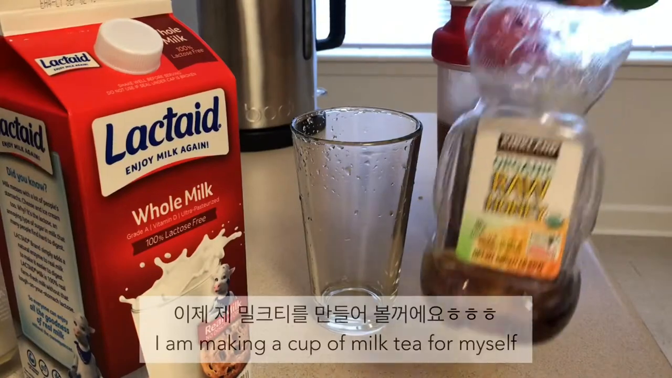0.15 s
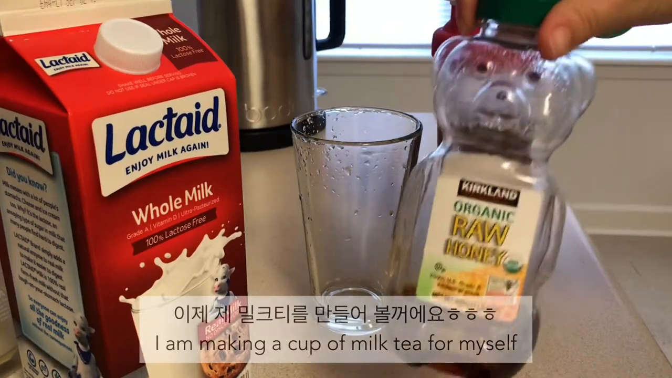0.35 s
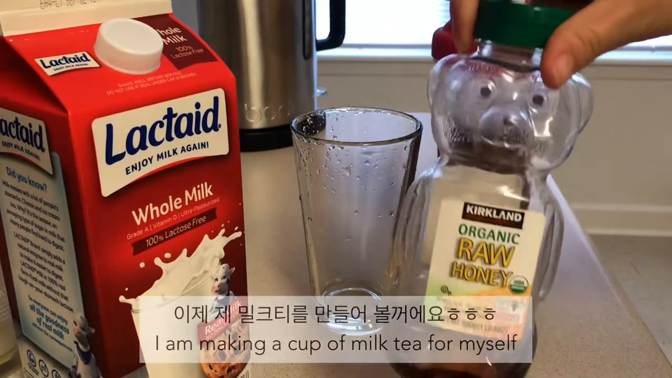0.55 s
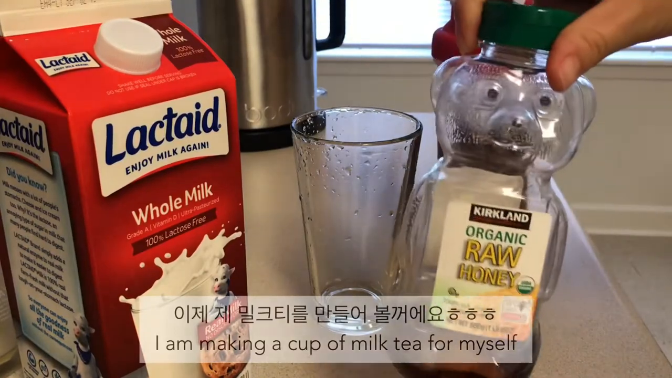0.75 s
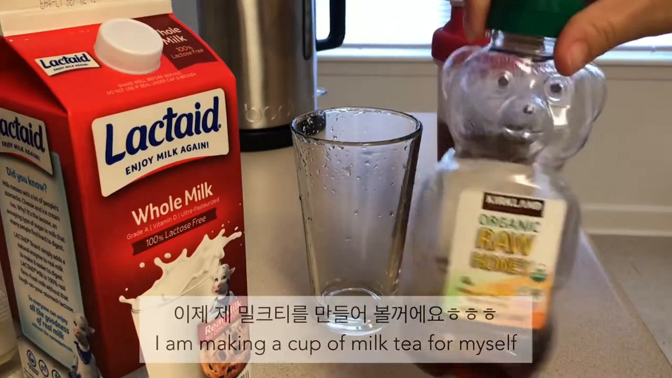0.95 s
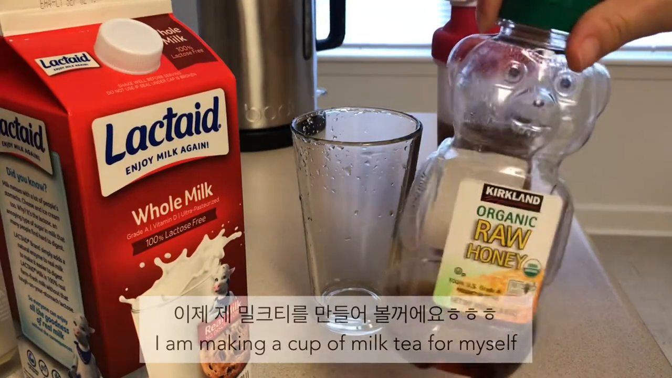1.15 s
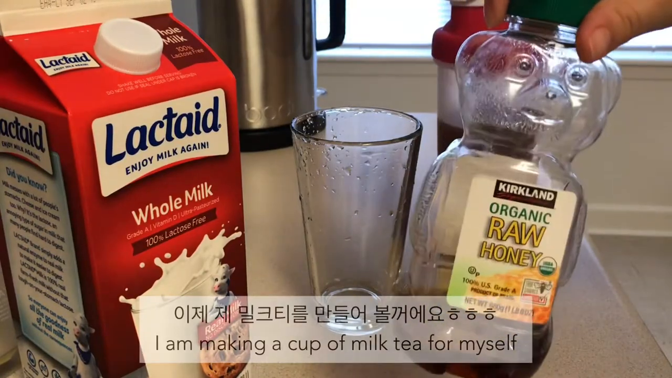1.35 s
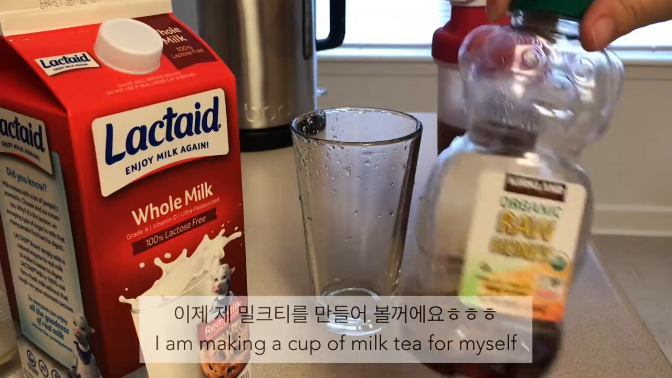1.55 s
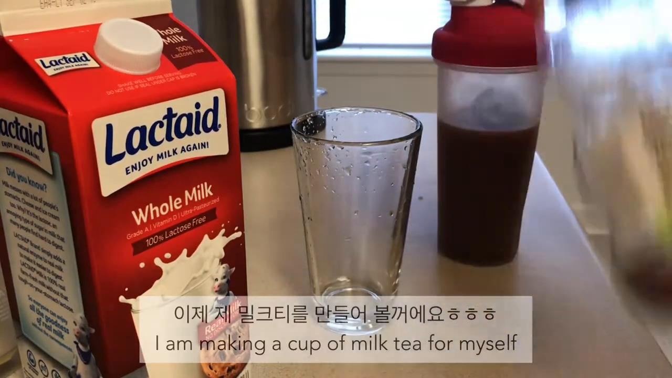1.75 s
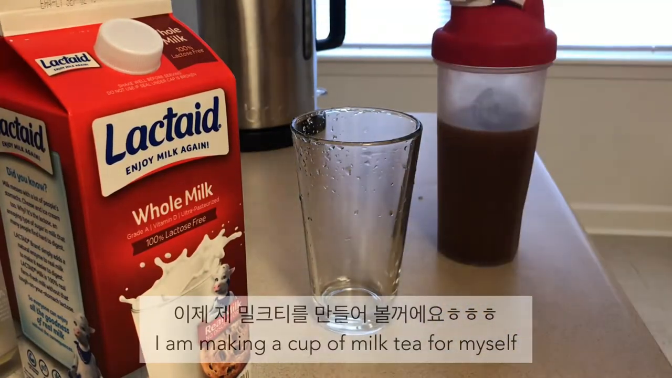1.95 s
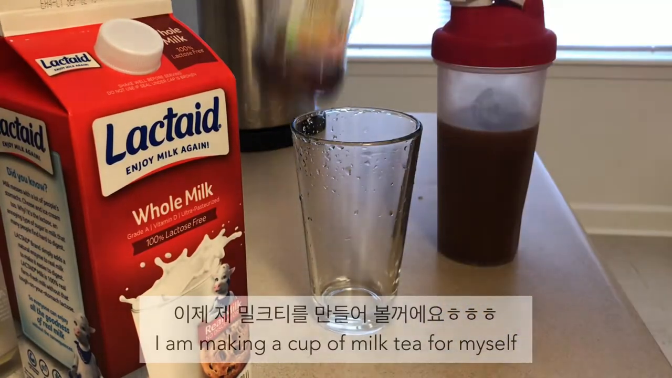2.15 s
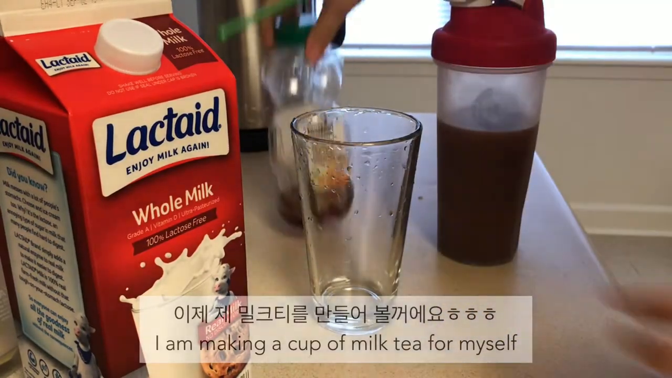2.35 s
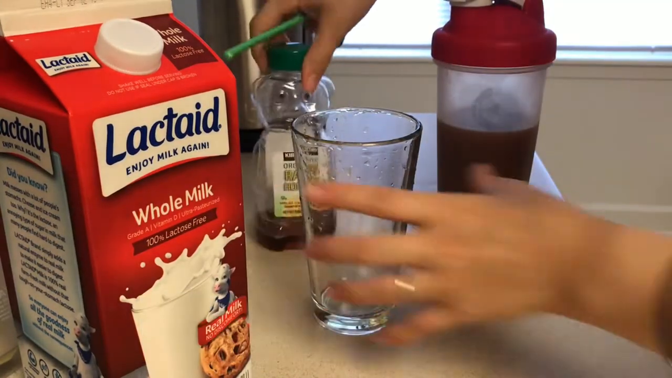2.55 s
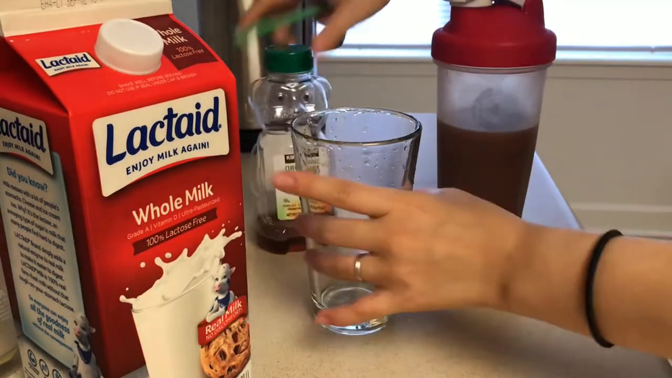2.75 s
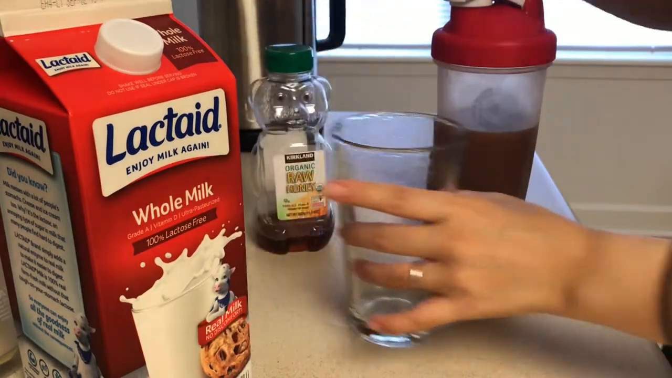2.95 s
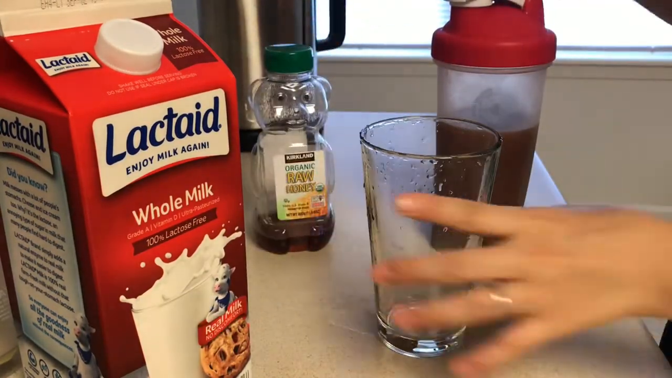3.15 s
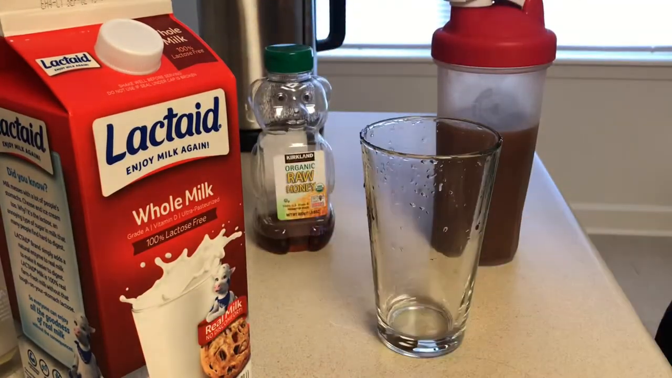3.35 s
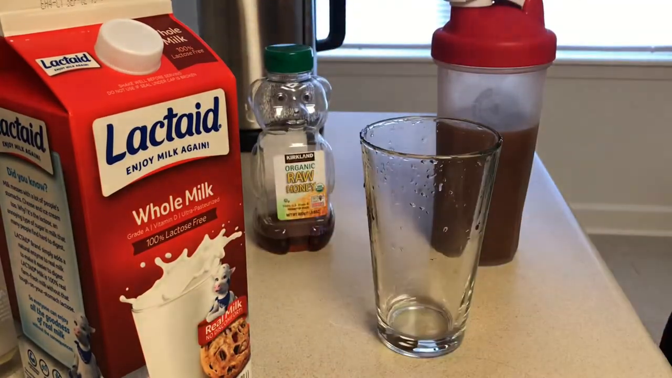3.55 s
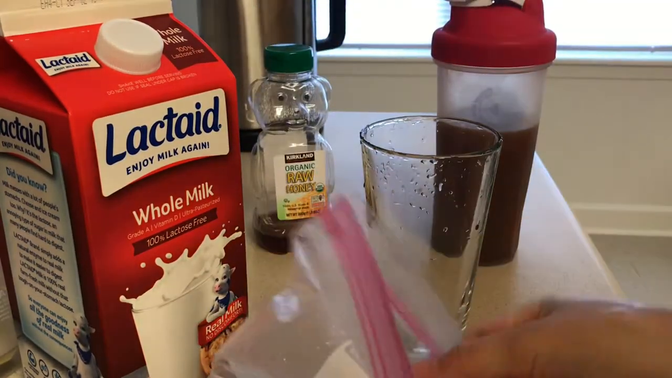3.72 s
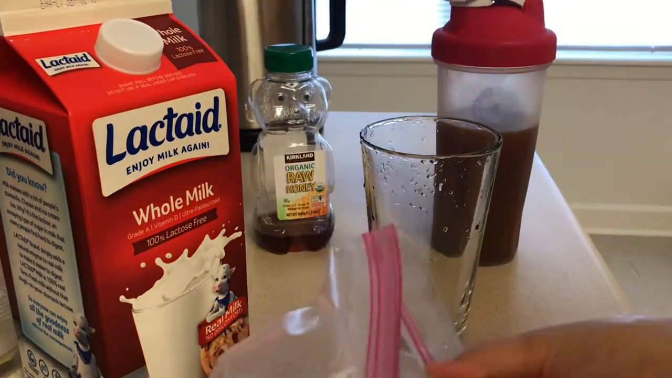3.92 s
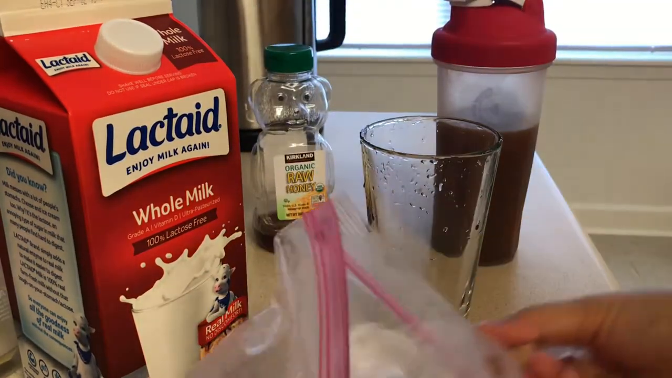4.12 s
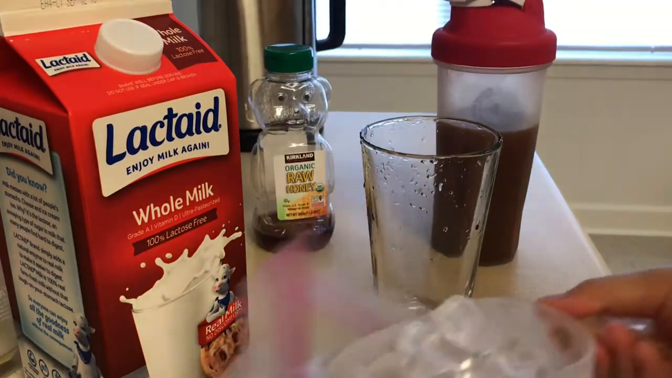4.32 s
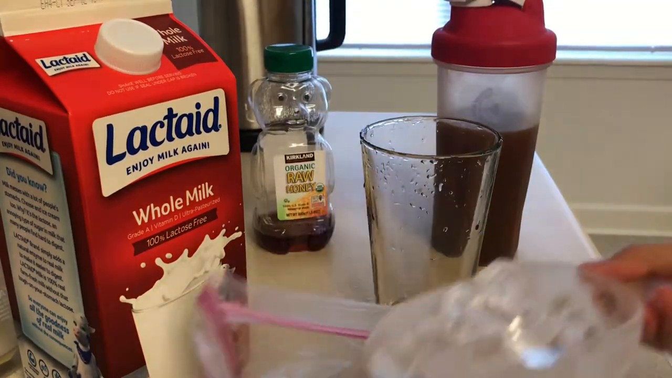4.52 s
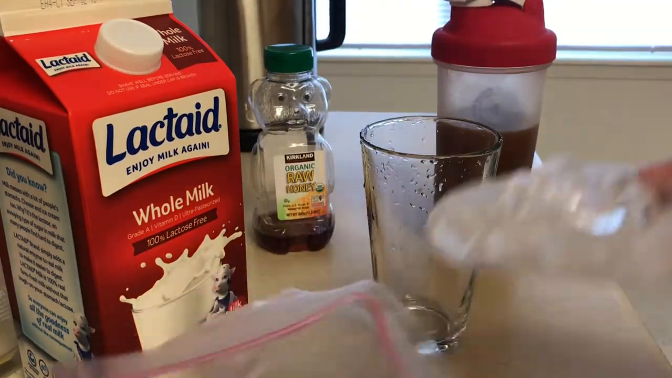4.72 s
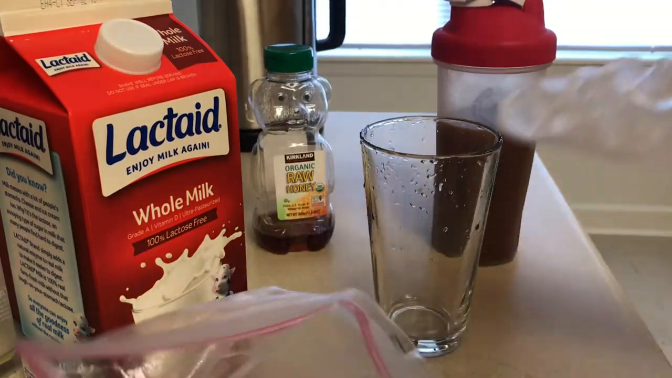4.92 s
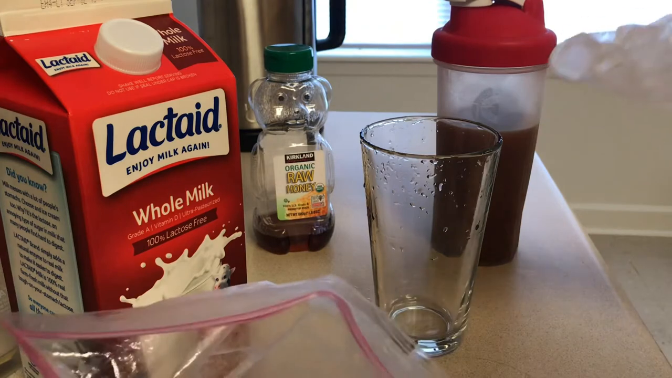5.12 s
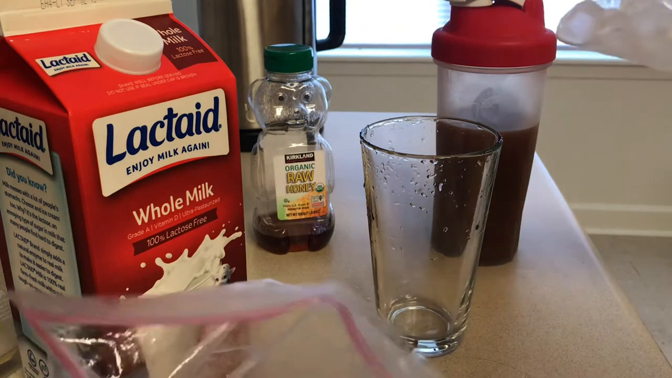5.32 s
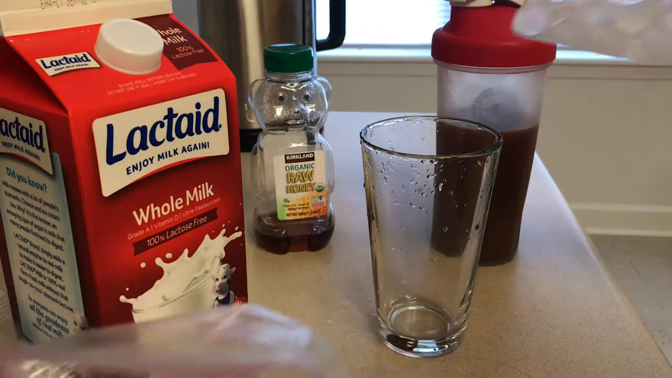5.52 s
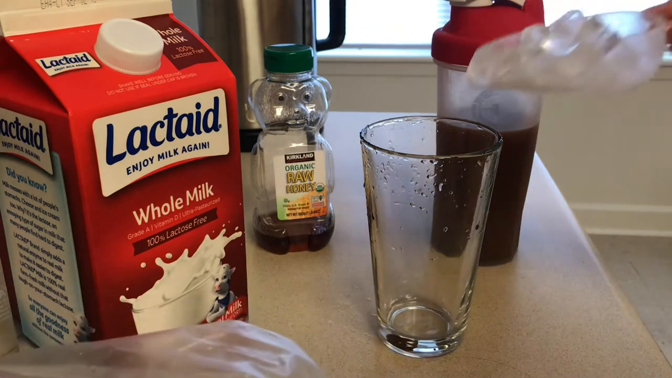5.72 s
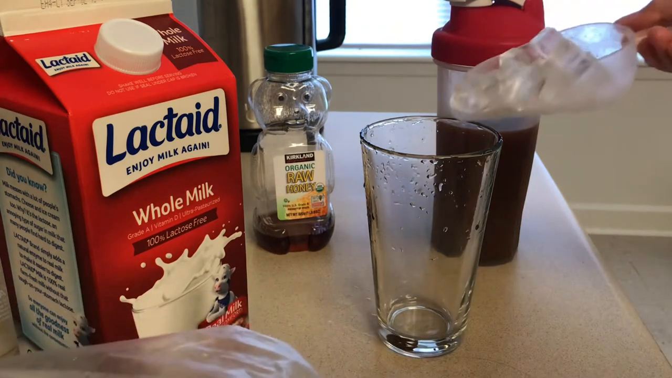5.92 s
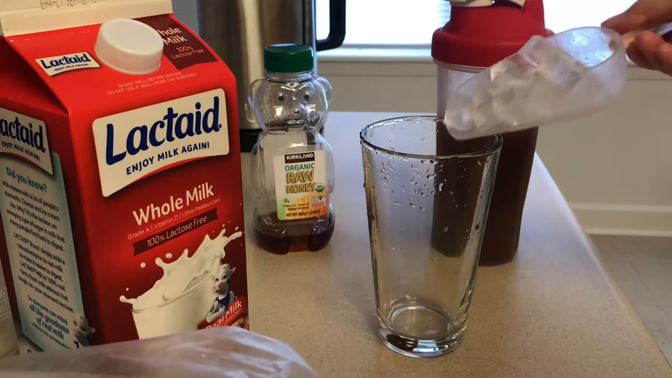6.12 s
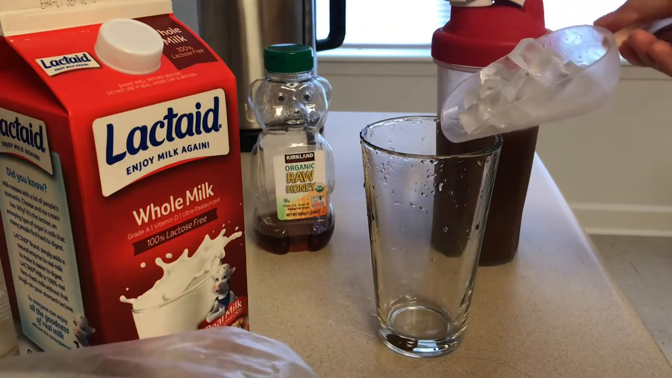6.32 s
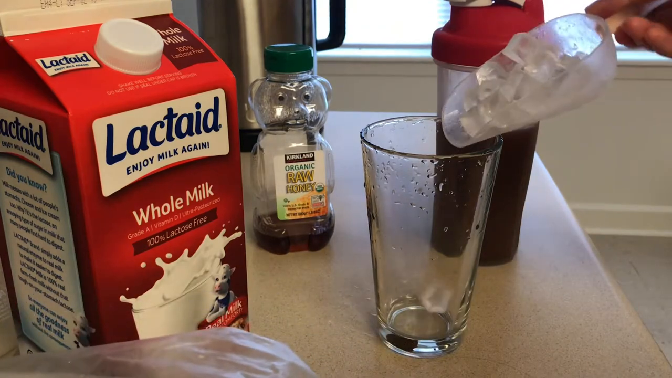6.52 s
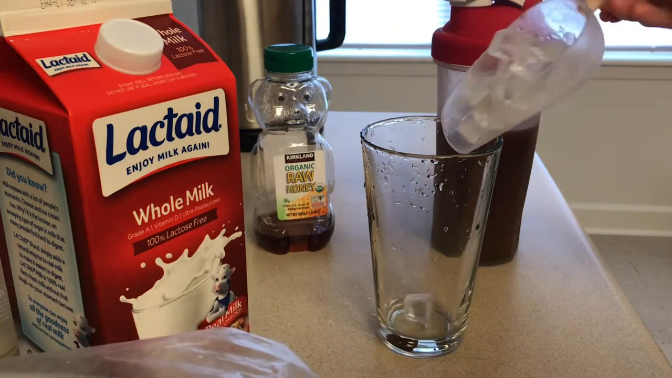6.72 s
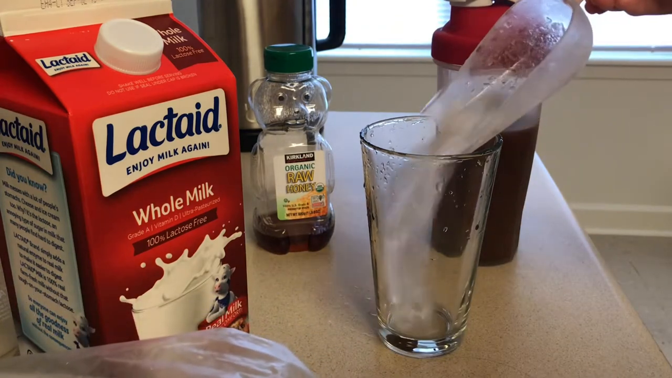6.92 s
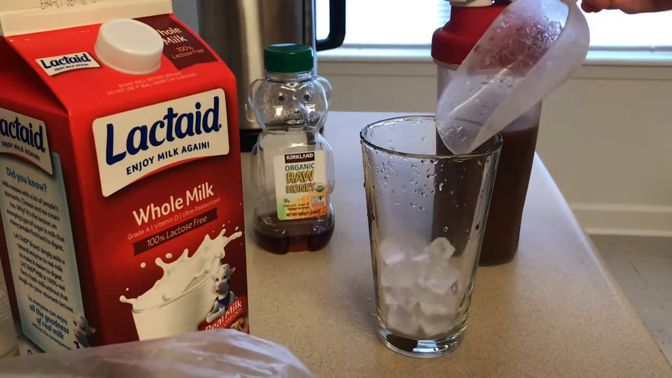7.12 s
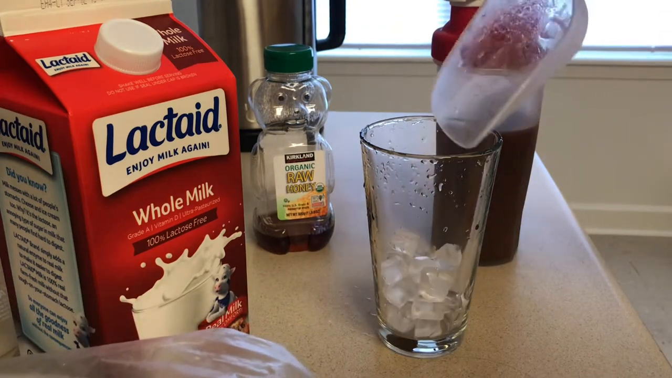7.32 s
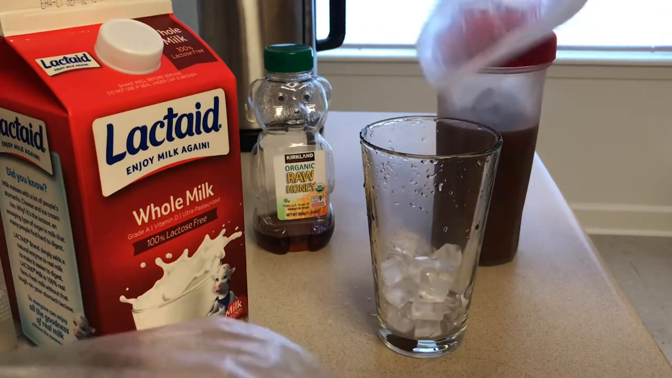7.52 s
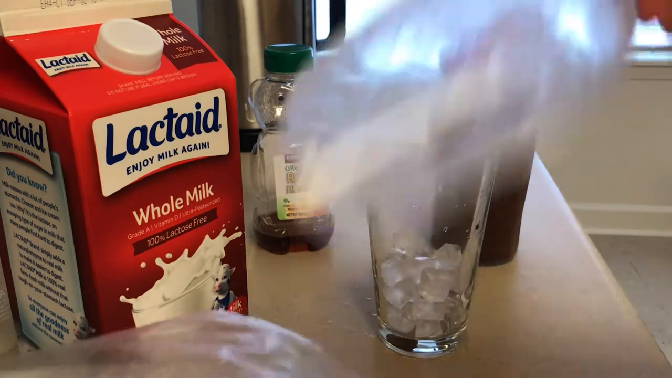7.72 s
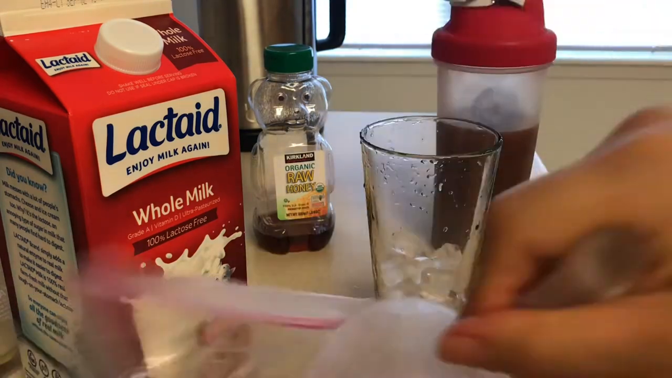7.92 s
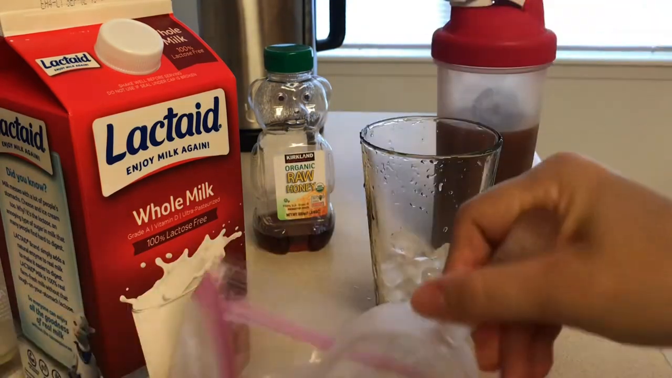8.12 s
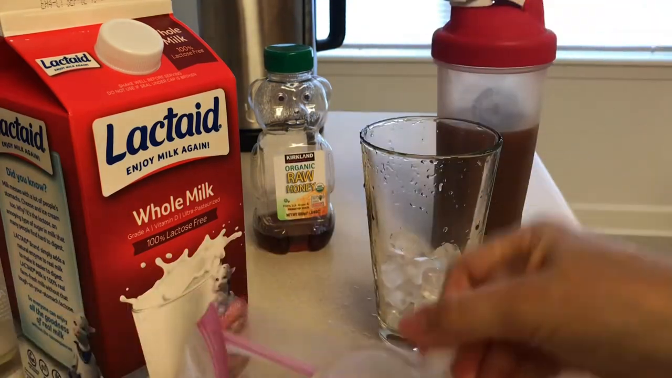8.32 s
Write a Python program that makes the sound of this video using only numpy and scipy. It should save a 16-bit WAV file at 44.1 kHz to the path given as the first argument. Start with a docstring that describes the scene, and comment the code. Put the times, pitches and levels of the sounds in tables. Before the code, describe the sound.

Close microphone on a kitchen counter with faint dull ventilation. A bottle lands with a solid thump and small bumps, and a glass scrapes briefly. A plastic scoop crunches into ice in a crinkling bag, with sharp knocks and film snaps. One cube rings the rim and bounces on the counter, another drops in, then the rest clatter into the glass. The scoop rustles back into the bag.

```python
"""Ice scooped into a glass

On a kitchen counter a honey bottle is set down and a drinking glass is slid: ringing modes, stick and slip.
A plastic scoop digs ice from a crinkling bag: showers of tiny contacts, single knocks and film snaps.
One cube rings the rim and bounces on the counter, a second drops in, the rest clatter into the glass:
decaying glass modes and base knocks. The scoop returns to the bag. Ventilation noise and hum lie under it."""
import sys
import numpy as np
from scipy import signal
from scipy.fft import rfft, irfft
from scipy.io import wavfile

SR = 44100
rng = np.random.default_rng(int(sys.argv[2]) if len(sys.argv) > 2 else 0)


def log_audio(samples):
    """Write samples as a 16-bit WAV file to the path given in sys.argv[1]."""
    # one column per channel
    frames = np.atleast_2d(samples).T
    # limit to full scale, then quantise
    limited = np.clip(frames, -1, 1)
    pcm = np.round(limited * 32767).astype(np.int16)
    wavfile.write(sys.argv[1], SR, pcm)


N = 368676

# ventilation air spectrum, relative: freq_hz, density_db
AIR_TONE = [(25, -32), (62, 0.5), (88, -6.5), (160, 2), (220, -7), (310, -4), (460, -14), (580, -7.5),
            (750, -15), (980, -11.5), (1300, -22.5), (2000, -29), (4500, -41), (16000, -50.5)]
# ventilation hum lines, before the hum trim: freq_hz, relative_rms_db
HUM_LINES = [(59.2, -74), (150.7, -71), (258.4, -79), (317.6, -76.5), (355.3, -82), (414.5, -80.5),
             (565.2, -76.5), (656.8, -83.5), (974.4, -84)]
AIR_RMS_DB = -63

# room decay: freq_hz, t60_s
ROOM_DECAY = [(120, 0.33), (400, 0.39), (1500, 0.5), (5000, 0.65), (10000, 0.61), (16000, 0.25)]
# room reflection level, relative: freq_hz, level_db
ROOM_TONE = [(100, -11.5), (500, -3), (1500, -5), (5000, -9), (10000, -10), (16000, -8)]
BAND_EDGE_HZ = 16050

# bottle and hand bump the counter: start_s, relative_level_db, hardness_db_per_octave
BUMPS = [(2.5226, -25.5, 0), (2.618, -41.5, -1.5), (2.623, -45, -7), (2.757, -41, -5), (2.796, -39.5, -3.5),
         (2.811, -40, -4.5), (2.847, -40, -8)]
# counter top modes: freq_hz, relative_level_db, t60_s
COUNTER_MODES = [(72, -17, 0.17), (121, -4, 0.15), (154, -3, 0.087), (189, -2, 0.14), (246, -8.5, 0.062),
                 (310, -12.5, 0.068), (562, -17.5, 0.096), (730, -5, 0.043), (840, -12, 0.045),
                 (1015, -1, 0.033), (1105, -9, 0.04), (1350, -14, 0.035), (2490, -18, 0.017)]

# glass slid over the counter: time_s, relative_level_db
GLASS_DRAG = [(2.89, -63), (3.06, -55), (3.18, -61), (3.22, -85)]
# scrape spectrum, relative: freq_hz, level_db
DRAG_TONE = [(88, -16), (170, 3.5), (330, -2), (440, 0), (560, -8), (1000, -10), (1700, -14), (2200, -19),
             (4000, -25.5), (7000, -30.5), (16000, -38.5)]
# soft brush as the bottle is lifted: start_s, swell_s, settling_s, relative_level_db
BOTTLE_BRUSH = [(1.74, 0.062, .12, -71.5)]
# brush spectrum, relative: freq_hz, level_db
BRUSH_TONE = [(1000, -14), (2500, 1), (4300, 2), (7000, -6), (12000, -12), (16000, -17)]
# whole bag shoved along the counter: start_s, swell_s, settling_s, relative_level_db
BAG_SHOVES = [(3.56, 0.023, 0.14, -53.5), (8.108, .012, 0.62, -52)]
# spectrum of the bag rubbing on the counter, relative: freq_hz, level_db
RUB_TONE = [(30, -19), (70, -1), (120, -2.5), (200, -5), (330, -7), (500, 0.5), (800, -3.5), (1200, -7),
            (3000, -46.5)]
# rubbing level at a reference grinding level, and its rise with the grinding
RUB_DB, RUB_AT_GRIND_DB, RUB_DB_PER_GRIND_DB = -59.5, -49, 0.46

# scoop pushed through the ice: start_s, swell_s, settling_s, relative_grinding_db, crinkling_db
SCOOP_DIGS = [(3.617, 0.0094, 0.68, -44.5, -54.5), (3.89, 0.077, 0.21, -42.5, -48.5),
              (4.14, 0.11, 0.31, -50.5, -56), (4.345, 0.019, .24, -50, -52.5),
              (4.575, 0.0069, 0.19, -58.5, -56.5), (4.65, 0.05, 0.23, -51, -53),
              (4.98, 0.067, 0.28, -61.5, -68), (5.15, 0.013, 0.11, -57, -69),
              (5.43, 0.098, 0.31, -50.5, -57.5), (7.49, 0.072, 0.057, -54.5, -59.5),
              (7.765, 0.02, 0.12, -56, -63), (7.92, 0.086, 0.23, -55, -51.5),
              (8.07, 0.042, 0.43, -51.5, -57), (8.17, 0.079, 0.25, -48, -51.5)]
# a push dies away ever faster: fall over one settling time, and its curvature
SETTLE_DB, SETTLE_EXPONENT = -19, 1.65
# spectrum of ice on ice, relative: freq_hz, level_db
ICE_TONE = [(80, -26), (250, -10.5), (520, -12), (800, -10), (1150, -4), (1650, -0.5), (2250, -5),
            (3200, -4.5), (4500, -7), (6500, -9.5), (10000, -19), (16000, -17)]
# large bag creases snap: start_s, peak_db, brightness_db_per_octave
BAG_SNAPS = [(4.8007, -38, -4), (4.871, -33.5, -2.5), (4.9037, -32.5, -1), (5.0025, -37, -4),
             (5.0523, -36.5, -4.5), (5.085, -34, 0.5), (5.3539, -33, 2.5), (5.4594, -29.5, 0),
             (7.6175, -39.5, -2), (7.628, -34, -1.5), (7.6886, -40, 5), (7.7713, -34.5, -5),
             (7.8818, -37.5, -5.5), (7.9124, -42.5, -5.5), (7.9351, -38, -5.5), (8.0106, -31, -2)]
# spectrum of a film snap, relative: freq_hz, level_db
SNAP_TONE = [(300, -16.5), (1500, -6.5), (3500, -3), (7000, -0.5), (12000, 0), (16000, 0)]
# crumpled film relaxes in small ticks: start_s, end_s, typical_peak_db
FILM_RELAXING = [(4.751, 5.448, -46.5), (5.603, 5.96, -45.5), (7.49, 7.9, -46), (7.899, 8.02, -37)]
TICKS_PER_S, TICK_SPREAD_DB, TICK_TILT_DB_PER_OCTAVE = 18, 1.5, -6.5

# cubes slide down the scoop: time_s, relative_level_db
SCOOP_SLIDE = [(6.77, -82), (6.848, -54.5), (6.93, -54), (6.942, -50.5), (7.01, -58.5), (7.098, -52),
               (7.4, -84.5)]
# plastic scoop spectrum, relative: freq_hz, level_db
SCOOP_TONE = [(180, -39), (300, -8.5), (555, -11.5), (656, 3), (713, -13), (961, -5.5), (1300, -8.5),
              (1750, -2), (2440, -9), (3520, -2.5), (7440, -11), (8360, -6.5), (10200, -15), (13800, -11.5),
              (16000, -26)]
# cubes knock together in bag and scoop: start_s, peak_db, pitch_hz, brightness_db_per_octave
ICE_KNOCKS = [(3.6214, -32.5, 1520, 0), (3.7051, -21, 1650, 0), (3.77, -30.5, 2950, -1),
              (3.9069, -30, 1531, 1), (3.9524, -24.5, 3330, 0), (3.9922, -20, 3150, 4),
              (4.089, -24, 3320, 1), (4.125, -29, 3360, -3.5), (4.28, -31.5, 1813, 1.5),
              (4.332, -34.5, 2600, 1), (4.3696, -27, 5400, 4), (4.4154, -27, 4550, 6),
              (4.431, -28.5, 4750, 7), (5.163, -35, 1750, 2), (5.176, -26, 2280, 4),
              (5.642, -35.5, 4140, 6.5), (6.928, -30.5, 1520, 3.5), (6.9417, -33.5, 4686, -2),
              (7.569, -40.5, 2960, 1.5), (8.1156, -34, 1890, -7.5), (8.2773, -30, 1670, -4.5),
              (8.2886, -24, 1740, -1.5), (8.3431, -33, 1850, -2)]
REBOUND_S, REBOUND_DB = 0.0055, -7  # typical gap; level relative to the first strike

# a cube bounces on the counter: start_s, relative_peak_db, brightness_db_per_octave
CUBE_BOUNCES = [(6.221, -18.5, 0), (6.267, -26.5, 1), (6.351, -25, 0), (6.422, -29.5, 0), (6.443, -36, -2),
                (6.497, -25.5, 4)]
# bounce spectrum, relative: freq_hz, level_db
BOUNCE_TONE = [(150, -21), (400, -11.5), (600, -4), (750, -9), (1230, -1), (1750, -3), (2050, -3),
               (2500, -5), (4200, -8.5), (6000, -16), (10000, -24), (16000, -26.5)]

# glass modes, t60 before treble loss and damping: freq_hz, t60_s, relative_rim_db, relative_wall_db
GLASS_MODES = [(1921, .5, -44, -47), (1934, .4, -62, -54), (4056, .2, -62, -68), (4090, .37, -39, -51.5),
               (5690, .15, -52, -58), (5790, .24, -47, -43), (5867, .22, -48, -43), (6914, .24, -35.5, -69),
               (8065, .18, -52, -57), (8098, .22, -49, -54), (10502, .18, -40.5, -73),
               (10780, .18, -48, -66), (11584, .22, -49, -55), (11825, .23, -56, -55),
               (11877, .23, -47, -53), (12472, .24, -45, -55), (14765, .23, -47, -67),
               (15300, .1, -52, -68)]
# ice strikes the glass: start_s, strength_db, height (0 low on the wall .. 1 rim), brightness_db_per_octave
GLASS_CLINKS = [(6.0883, 2, 0.97, 1.5), (6.481, -9, .03, -1), (6.979, 0.5, 0.027, 1.5),
                (7.005, -8, 0.27, 1), (7.016, 0, 0.11, 0), (7.038, 4, 0.083, -1.5), (7.06, -0.5, .1, 4),
                (7.081, 2.5, 0.14, 6.5), (7.094, 2.5, 0.6, 0.5), (7.105, 4.5, 0.089, -3),
                (7.126, 0.5, 0.12, 1), (7.168, 0, 0.4, 3), (7.207, -9.5, 0.35, 2), (7.245, -20, 0.18, 4),
                (7.324, -23, 0.092, -1), (7.37, -25, 0.2, -4)]
# cubes land on the thick glass base: start_s, relative_peak_db
BASE_LANDINGS = [(6.513, -36), (6.627, -50), (6.667, -50.5), (7.019, -43), (7.036, -37.5), (7.057, -38.5),
                 (7.081, -37), (7.107, -41.5)]
# base knock spectrum, relative: freq_hz, level_db
BASE_TONE = [(100, -12.5), (220, -6), (360, -4), (510, -8), (650, 1.5), (800, -14), (970, -6), (1300, -24),
             (1750, -11), (2300, -25), (5000, -25.5), (16000, -39)]


def amp(db):
    """Decibels to gain."""
    return 10 ** (np.asarray(db) / 20)


def evened(x):
    """Scales to rms 1."""
    return x / np.sqrt(np.mean(x ** 2) + 1e-20)


def sized(x, peak_db):
    """Sets the peak level."""
    return amp(peak_db) * x / abs(x).max()


def in_band(x, low_hz, high_hz):
    """Scales the whole sound so that its part in the band has rms 1."""
    edges_hz = [low_hz, min(high_hz, SR / 2 - 1)]
    band = signal.sosfilt(signal.butter(4, edges_hz, "band", fs=SR, output="sos"), x)
    return x / band.std()


def read(points, hz):
    """Reads a curve on a log-frequency axis."""
    point_hz, value = np.transpose(points)
    return np.interp(np.log(hz + 1), np.log(point_hz + 1), value)


def add(mix, start_s, sound):
    """Mixes a sound in at its start time."""
    part = mix[round(start_s * SR):][:len(sound)]
    part += sound[:len(part)]


def level(rows):
    """Gain over time from a dB curve, silent outside it."""
    time_s, level_db = np.transpose(rows)
    return amp(np.interp(np.arange(N) / SR, time_s, level_db, left=-np.inf, right=-np.inf))


def pushes(rows, column=0):
    """Gain of overlapping hand pushes that swell, then settle ever faster; column picks the dB column."""
    t, power = np.arange(N) / SR, np.zeros(N)
    for start_s, swell_s, settling_s, *db in rows:
        rise = np.clip((t - start_s) / swell_s, 0, 1)
        fall = np.clip((t - start_s - swell_s) / settling_s, 0, 2) ** SETTLE_EXPONENT
        active = t < start_s + swell_s + 2 * settling_s
        power += (rise * amp(db[column] + SETTLE_DB * fall) * active) ** 2
    return np.sqrt(power)


def colour(x, tone, tilt_db=0, peak_hz=1000, peak_db=0, peak_octaves=0.1, size=1024):
    """Causal filter with a spectrum, a treble tilt per octave and one optional resonance."""
    hz = np.fft.rfftfreq(size, 1 / SR)
    octaves_off_peak = np.log2((hz + 1) / peak_hz)
    tilt = tilt_db * np.log2(np.hypot(1, hz / 1000))
    resonance = peak_db / (1 + (octaves_off_peak / peak_octaves) ** 2)
    gain = amp(read(tone, hz) + tilt + resonance)
    log_gain = np.log(np.concatenate([gain, gain[-2:0:-1]]) + 1e-6)
    # minimum phase: nothing sounds before the blow
    taps = np.fft.ifft(np.exp(np.conj(signal.hilbert(log_gain)))).real
    return signal.oaconvolve(x, taps)[:len(x)]


def contact(t60_s, rattle_db, size=4096, crush_s=0.0012):
    """Surfaces crush briefly, then a sharp push sets off a dense, fast-dying vibration."""
    t = np.arange(size) / SR - crush_s
    crush = np.exp(np.minimum(t, 0) / 0.0002)
    decay = amp(-60 * np.maximum(t, 0) / t60_s)
    rattle = rng.standard_normal(size) * np.where(t < 0, crush, decay)
    push = np.arange(size) == np.argmax(t >= 0)
    return push + amp(rattle_db) * rattle / np.linalg.norm(rattle)


def grains(per_s, spread_db, t60_s, ring_db=0, clump_db=0, count=20):
    """Dense shower of tiny contacts at rms 1; each piece has its own pitch and busy moments."""
    at = np.flatnonzero(rng.random(N) < per_s / SR)
    strength = amp(spread_db * np.minimum(rng.exponential(1, len(at)), 4))
    strength = strength * rng.choice([-1, 1], len(at))
    piece, out = rng.integers(0, count, len(at)), np.zeros(N)
    for k, pitch_hz in enumerate(np.geomspace(900, 15000, count)):
        busy = np.interp(at, np.linspace(0, N, 250), rng.uniform(-1, 1, 250))
        clicks = np.bincount(at, strength * amp(clump_db * busy) * (piece == k), N)
        hit = contact(t60_s, rattle_db=9, size=768)
        sound = colour(hit, [(1, 0)], 0, pitch_hz, ring_db, 5 / np.sqrt(pitch_hz))
        out += signal.oaconvolve(clicks, evened(sound))[:N]
    return evened(out)


def ventilation(hum_trim_db=-1, line_width_hz=3):
    """Dull steady air noise with hum lines that waver because each is a narrow noise band."""
    hz = np.fft.rfftfreq(N, 1 / SR)
    air = evened(irfft(rfft(rng.standard_normal(N)) * amp(read(AIR_TONE, hz)), N))
    power = sum(amp(db) ** 2 * np.exp(-((hz - f) / line_width_hz) ** 2) for f, db in HUM_LINES)
    hum = evened(irfft(rfft(rng.standard_normal(N)) * np.sqrt(power), N))
    hum_rms = amp(hum_trim_db) * np.linalg.norm([amp(db) for f, db in HUM_LINES])
    return amp(AIR_RMS_DB) * air + hum_rms * hum


def kitchen(x, delay_s=0.0034):
    """Scattered reflections from cupboards and walls, each band dying at its own speed."""
    size = SR // 2
    taps = rng.choice([-1.0, 1.0], size) * (rng.random(size) < 4000 / SR)
    taps = taps * (np.arange(size) > delay_s * SR)
    hz, t, bands = signal.stft(taps, SR, nperseg=256)
    bands = bands * amp(-60 * t / read(ROOM_DECAY, hz)[:, None])
    norm = np.linalg.norm(signal.istft(bands, SR, nperseg=256)[1])
    tail = signal.istft(bands * amp(read(ROOM_TONE, hz))[:, None], SR, nperseg=256)[1] / norm
    return signal.oaconvolve(x, tail)[:N]


def counter(crack_db=-5, rise_cycles=0.58):
    """Blows ring the counter's modes, low ones building up slower; hard blows crack louder."""
    out, t = np.zeros(N), np.arange(SR // 3) / SR
    for start_s, db, hard_db in BUMPS:
        for k, (hz, mode_db, t60_s) in enumerate(COUNTER_MODES):
            swell = 1 - np.exp(-t * hz / rise_cycles)
            decay = amp(-60 * t / t60_s)
            gain = amp(db + mode_db + hard_db * np.log2(max(hz / 200, 1)))
            add(out, start_s, (-1) ** k * gain * swell * decay * np.sin(2 * np.pi * hz * t))
        hit = contact(t60_s=0.062, rattle_db=13, crush_s=0.00028)
        crack = colour(hit, DRAG_TONE, tilt_db=-2.5)
        add(out, start_s, sized(crack, db + crack_db + 0.86 * hard_db))
    return out


def handling(drag_db=-1.5, brush_db=-2, shove_db=-3):
    """Fine stick and slip under the glass and the bag, soft noise along the bottle."""
    slips = grains(per_s=2500, spread_db=3.5, t60_s=0.0051, count=4)
    drag = amp(drag_db) * level(GLASS_DRAG) * in_band(colour(slips, DRAG_TONE), 280, 1020)
    # the bag rubs more gently than the ice grinds
    dig_gain = amp(RUB_DB) * (pushes(SCOOP_DIGS) / amp(RUB_AT_GRIND_DB)) ** RUB_DB_PER_GRIND_DB
    rub_gain = np.hypot(dig_gain, amp(shove_db) * pushes(BAG_SHOVES))
    rub = rub_gain * in_band(colour(slips, RUB_TONE), 350, 900)
    brush_noise = evened(colour(rng.standard_normal(N), BRUSH_TONE))
    brush = amp(brush_db) * pushes(BOTTLE_BRUSH) * brush_noise
    return drag + rub + brush


def small_snaps():
    """Relaxing film: one tick at a random moment in each short interval, as rows like BAG_SNAPS."""
    rows = []
    for start_s, end_s, typical_db in FILM_RELAXING:
        for s in np.arange(start_s, end_s, 1 / TICKS_PER_S):
            tick_s = s + rng.random() / TICKS_PER_S
            peak_db = typical_db + TICK_SPREAD_DB * rng.standard_normal()
            rows.append((tick_s, peak_db, TICK_TILT_DB_PER_OCTAVE))
    return rows


def bag(ice_db=-1.14):
    """Cubes grind on each other while the film crinkles around them and single creases snap."""
    grinding = grains(per_s=1500, spread_db=3, t60_s=0.012, ring_db=16, clump_db=6)
    ice = in_band(colour(grinding, ICE_TONE), 650, 4500)
    crinkling = grains(per_s=1700, spread_db=5, t60_s=0.017, ring_db=18.5, clump_db=8.5)
    film = in_band(colour(crinkling, SNAP_TONE, tilt_db=0.8), 4900, 18000)
    out = amp(ice_db) * pushes(SCOOP_DIGS) * ice + pushes(SCOOP_DIGS, column=1) * film
    for start_s, peak_db, bright_db in BAG_SNAPS + small_snaps():
        snap = colour(contact(t60_s=0.0093, rattle_db=13.5), SNAP_TONE, bright_db)
        add(out, start_s, sized(snap, peak_db))
    return out


def scoop(slide_db=-1.5):
    """Cubes skid along the plastic, knock together and rebound, each with its own short ring."""
    skids = grains(per_s=1900, spread_db=3, t60_s=0.014, ring_db=11.5, clump_db=5, count=10)
    out = amp(slide_db) * level(SCOOP_SLIDE) * in_band(colour(skids, SCOOP_TONE), 2380, 3670)
    for start_s, peak_db, pitch_hz, bright_db in ICE_KNOCKS:
        for hop in range(2):
            hit = contact(t60_s=0.02, rattle_db=14.5)
            knock = colour(hit, ICE_TONE, bright_db, pitch_hz, peak_db=10.5, peak_octaves=0.11)
            hop_s = start_s + hop * REBOUND_S * rng.uniform(0.76, 1.1)
            add(out, hop_s, sized(knock, peak_db + hop * REBOUND_DB))
    return out


def stray_cube(bounce_db=-1):
    """A cube bouncing on the counter makes a short, coloured clack at each touch."""
    out = np.zeros(N)
    for start_s, db, bright_db in CUBE_BOUNCES:
        hit = contact(t60_s=0.025, rattle_db=3, crush_s=0.002)
        add(out, start_s, sized(colour(hit, BOUNCE_TONE, bright_db), db + bounce_db))
    return out


def glass(ring_db=3, tick_db=-35, rim_tick_db=11, base_db=3, damping=0.69, detune=0.0016, treble_loss=0.36):
    """Rim blows wake the pure bell modes, low blows the beating wall pairs; the base only knocks."""
    out, t = np.zeros(N), np.arange(SR * 3 // 4) / SR
    hz, t60_s, rim_db, wall_db = np.transpose(GLASS_MODES)
    t60_s = t60_s / np.maximum(hz / 4500, 1) ** treble_loss  # high modes die sooner
    for start_s, db, height, bright_db in GLASS_CLINKS:
        # ice lying against the wall damps the modes and shifts them slightly
        decay = amp(-60 * t / (t60_s[:, None] * (height + (1 - height) * damping)))
        shift, phase = rng.uniform(-1, 1, (2, len(hz), 1))
        mode_hz = hz[:, None] * (1 + detune * (1 - height) * shift)
        ringing = decay * np.sin(2 * np.pi * mode_hz * t + np.pi * phase)
        mode_db = height * rim_db + (1 - height) * wall_db + bright_db * np.log2(hz / 5000)
        add(out, start_s, amp(ring_db + db + mode_db) @ ringing)
        hit = contact(t60_s=0.043, rattle_db=8.5, crush_s=0.0003)
        tick = colour(hit, SNAP_TONE, bright_db)
        add(out, start_s, sized(tick, db + tick_db + rim_tick_db * height))
    for start_s, db in BASE_LANDINGS:
        knock = colour(contact(t60_s=0.14, rattle_db=7), BASE_TONE)
        add(out, start_s, sized(knock, db + base_db))
    return out


def scene(glass_room_db=-5, bag_room_db=-3, cube_room_db=0.5, counter_room_db=-4):
    """All sources on the counter, each with its share of the room, over the ventilation."""
    sources = [(counter() + handling(), counter_room_db), (bag() + scoop(), bag_room_db),
               (stray_cube(), cube_room_db), (glass(), glass_room_db)]
    direct = sum(sound for sound, room_db in sources)
    room = kitchen(sum(amp(room_db) * sound for sound, room_db in sources))
    return (direct + room + ventilation())[None]


def record(dry):
    """Low-pass with a steep linear-phase edge."""
    taps = signal.firwin(401, BAND_EDGE_HZ, window=("kaiser", 8), fs=SR)
    return signal.oaconvolve(dry, taps[None], "same")


dry = scene()
out = record(dry)
log_audio(out)
```